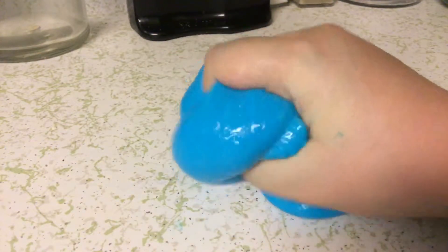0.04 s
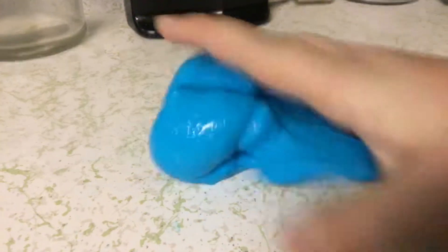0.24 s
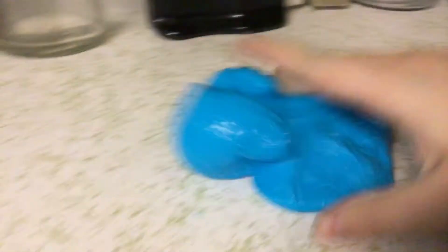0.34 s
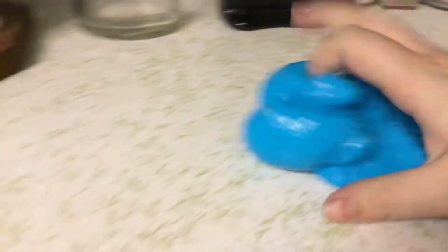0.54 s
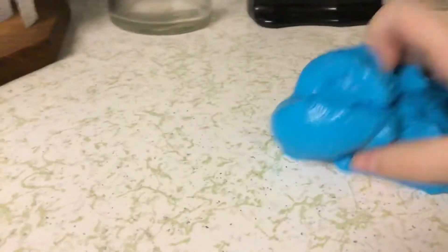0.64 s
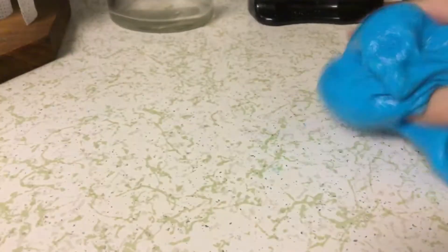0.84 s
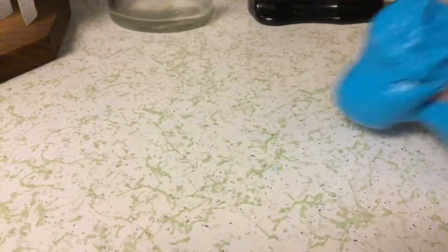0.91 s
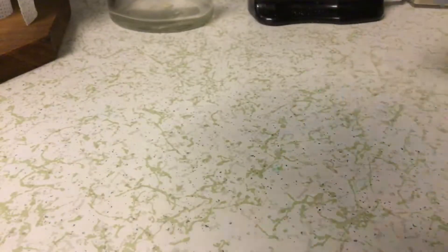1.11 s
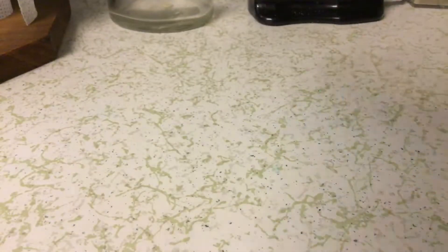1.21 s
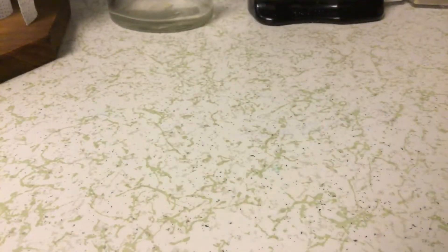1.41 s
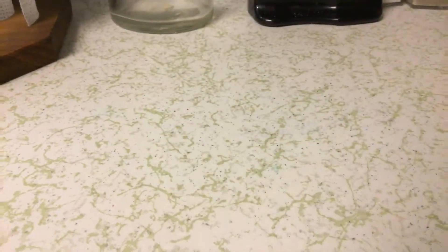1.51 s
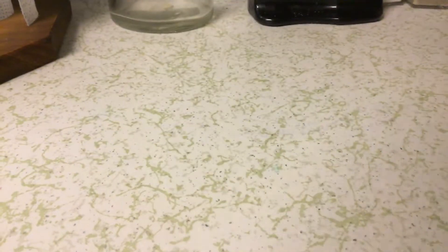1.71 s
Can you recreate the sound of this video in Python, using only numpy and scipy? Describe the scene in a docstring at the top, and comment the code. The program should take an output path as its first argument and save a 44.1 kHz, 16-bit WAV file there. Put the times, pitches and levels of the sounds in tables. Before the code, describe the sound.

Wet slime squeezed by hand snaps and pops sharply, then drags and peels off a counter

```python
"""A low hum and a faint crackle in a small room come first; then a hand squeezes slime on a kitchen counter.
Air pockets snap and pop, the soft mass thuds and air squelches out of its folds, close to the microphone.
The slime is dragged aside with a fluttering hiss and peels off the counter with a hollow rasp.
Snaps, pops, bubbles and thuds are fading sine waves, snaps with a noisy crack on top.
Squelches, crackles, drag and peel are showers of random clicks, shaped in tone and level."""
import sys
import numpy as np
from scipy import signal
from scipy.fft import rfft, irfft
from scipy.io import wavfile

SR = 44100
rng = np.random.default_rng(int(sys.argv[2]) if len(sys.argv) > 2 else 0)


def waveform_to_disk(signal):
    """Save audio, clipped to [-1, 1], as 16-bit WAV at the path in sys.argv[1]."""
    frames = np.transpose(np.atleast_2d(signal))
    scaled = np.clip(frames, -1, 1) * 32767
    samples = np.round(scaled).astype(np.int16)
    wavfile.write(sys.argv[1], SR, samples)


N = 77175  # length in samples: 1.75 s
T = np.arange(N) / SR  # time of each sample [s]
FREQS = np.maximum(np.arange(N // 2 + 1) * SR / N, 1)  # pitch of each spectrum bin [Hz], never 0


def undb(db):
    """Turn decibels into a gain."""
    return 10 ** (np.asarray(db) / 20)


def unit(x):
    """Scale a sound to an average (rms) level of 1."""
    return x / np.sqrt(np.mean(x ** 2))


def level_at(points):
    """Join (time, level) points with straight lines, one level in dB for each sample."""
    times, levels = np.array(points).T
    return np.interp(T, times, levels)


def colour(x, points):
    """Shape the tone of a sound by (frequency, level) points, at rms 1."""
    hz, db = np.array(points).T
    tone = undb(np.interp(np.log(FREQS), np.log(hz), db))
    return unit(irfft(rfft(x) * tone, N))


def fade(age, t60):
    """Die away evenly in dB, by 60 dB in t60 seconds."""
    return np.exp(-np.log(1000) * np.maximum(age, 0) / t60)


def swell(start, rise, t60):
    """Rise in a straight line, then die away."""
    return np.clip((T - start) / rise, 0, 1) * fade(T - start - rise, t60)


def sing(pitch):
    """A sine wave that follows a changing pitch [Hz]."""
    return np.sin(2 * np.pi * np.cumsum(pitch) / SR)


def grains(per_s):
    """Tiny ruptures: one-sample clicks of random size at random times."""
    return (rng.random(N) < per_s / SR) * rng.standard_normal(N)


def wander(per_s):
    """Random values joined by straight lines."""
    return np.interp(T * per_s, np.arange(1000), rng.standard_normal(1000))


def bursts(table, per_s):
    """Showers of equally strong ruptures, each coloured by the fold that it comes from."""
    out = np.zeros(N)
    for start, rise, t60, db, hz, octaves in table:
        # a bell around the centre with long skirts, leaning towards the bass
        distance = np.log2(FREQS / hz) / octaves
        bell = (1 + distance ** 2 / SQUELCH_SKIRT) ** (-SQUELCH_SKIRT / 2)
        fold = bell / np.sqrt(FREQS + hz)
        ruptures = np.sign(grains(per_s))
        out += undb(db) * swell(start, rise, t60) * unit(irfft(rfft(ruptures) * fold, N))
    return out


SQUELCH_SKIRT = 4.14  # higher makes the skirts of each bell fall faster

# tone of the room noise: (frequency [Hz], level per Hz [dB])
ROOM_TONE = [(15, -42), (25, -25), (87, -24), (114, 2), (153, -12.5), (190, -5.5), (223, -10), (354, -6.5),
             (427, -21), (489, -14), (531, -20), (677, -15.5), (754, -25.5), (7510, -47), (16000, -54)]
ROOM_TONE_DB = -57
# tones of the appliance hum: (frequency [Hz], rms level before the waver [dB])
HUM_TONES = [(59.2, -66.5), (118.4, -72.5), (188.4, -68.5), (360.7, -69.5)]
HUM_WAVER_DB, HUM_WAVER_PER_S = 3.5, 9.1
# change in the level of the background's bass: (time [s], level [dB])
RUMBLE = [(0, 6), (.8, -10), (.98, -3), (1.27, -8), (1.45, 2), (1.75, 1.5)]
RUMBLE_BELOW_HZ = 128


def background():
    """Room noise and a wavering appliance hum, whose bass dips for a while."""
    out = undb(ROOM_TONE_DB) * colour(rng.standard_normal(N), ROOM_TONE)
    for hz, db in HUM_TONES:
        level = undb(db + HUM_WAVER_DB * wander(HUM_WAVER_PER_S))
        out += np.sqrt(2) * level * np.sin(2 * np.pi * (hz * T + rng.random()))
    low_pass = signal.butter(2, RUMBLE_BELOW_HZ, fs=SR, output="sos")
    bass = signal.sosfiltfilt(low_pass, out)
    return out + bass * (undb(level_at(RUMBLE)) - 1)


# how loudly the slime drags over the counter, before the flutter: (time [s], level [dB])
DRAG = [(0, -69), (.15, -67), (.22, -60.5), (.3, -57), (.37, -54.5), (.42, -49), (.5, -54), (.62, -52.5),
        (.7, -56.5), (.78, -56.5), (.86, -66.5), (1.15, -75.5), (1.75, -80)]
# tone of the dragging hiss: (frequency [Hz], level per Hz [dB])
DRAG_COLOUR = [(200, -33), (420, -4), (620, 2.5), (900, -11.5), (1300, -6), (1700, -8), (2200, -4.5),
               (2700, -3), (3500, -2), (4500, -2), (5400, -10), (6900, -11.5), (8300, -13), (11300, -12.5),
               (15500, -15)]
DRAG_GRAINS_PER_S = 14000
DRAG_COARSE_DB, DRAG_COARSE_PER_S = -5.5, 620  # level against the fine contacts
DRAG_FLUTTER_DB, DRAG_FLUTTER_PER_S = 1.1, 120


def drag():
    """A fluttering hiss of countless small contacts letting go, with a few coarser ones."""
    fine = unit(grains(DRAG_GRAINS_PER_S))
    coarse = undb(DRAG_COARSE_DB) * unit(grains(DRAG_COARSE_PER_S))
    level = level_at(DRAG) + DRAG_FLUTTER_DB * wander(DRAG_FLUTTER_PER_S)
    return colour(fine + coarse, DRAG_COLOUR) * undb(level)


# small sticky ticks and crackles:
# (time [s], rise [s], t60 [s], level [dB], centre [Hz], width [octaves])
CRACKLES = [(0, 0.026, 1, -61, 556, .9), (.0615, 0.00068, 0.047, -51.5, 2530, 0.59),
            (.0615, 0.00082, 0.025, -59, 12900, 0.064), (.2035, 0.0023, 0.062, -51.5, 2300, 1),
            (.2885, 0.00026, 0.0027, -33.5, 3920, 1.15), (.342, .004, 0.041, -53, 13000, .2),
            (.3855, .0005, 0.011, -57, 2500, 1.1), (.6505, 0.00068, 0.0055, -43.5, 4000, 0.76),
            (.97, 0.045, 1, -68.5, 1900, 0.47), (1.035, 0.0032, .03, -62.5, 2760, 0.4),
            (1.03, .02, 0.072, -69.5, 11100, 0.56), (1.128, 0.0094, 0.041, -66, 11100, 1.2),
            (1.29, 0.014, 0.096, -66, 5080, 0.15), (.7325, 0.0014, 0.018, -46, 490, 0.55),
            (1.35, 0.0018, 0.022, -66, 5500, 0.44), (1.397, 0.0072, 0.28, -60.5, 760, 0.64),
            (1.40, 0.017, 0.4, -67.5, 4860, 1.1), (1.452, 0.0043, 0.18, -60, 4960, 0.9),
            (1.47, .016, 0.07, -59, 4000, 2.2), (1.486, 0.0014, 0.1, -56.5, 1060, 2),
            (1.495, 0.002, 0.14, -55.5, 690, 0.47), (1.539, .002, .06, -64.5, 5000, 0.92),
            (1.63, 0.01, 0.087, -73.5, 8250, 0.22)]
CRACKLE_GRAINS_PER_S = 2300


def crackles():
    """The sticky skin ticks and crackles in thin showers of ruptures."""
    return bursts(CRACKLES, CRACKLE_GRAINS_PER_S)


# soft mass meeting the counter: (time [s], first pitch [Hz], level [dB], rise [s], t60 [s])
THUDS = [(.066, 112, -45, 0.0092, 0.095), (0.246, 142, -27, 0.0023, 0.076), (0.282, 91, -40, 0.003, 0.1),
         (0.3, 114, -34, 0.0031, 0.089), (.382, 226, -37, 0.0025, 0.048), (0.393, 117.5, -29, 0.004, 0.14),
         (.652, 178, -41.5, .002, 0.04), (0.666, 95, -44, .006, .11), (0.7348, 162, -38, 0.0014, 0.034),
         (0.774, 99, -46, 0.0091, .1)]
SAG_SHARE, SAG_S = 0.7, 0.024  # share of the pitch that is lost, and how slowly


def thuds():
    """Low, soft bumps that sink in pitch as the mass spreads."""
    out = np.zeros(N)
    for start, hz, db, rise, t60 in THUDS:
        age = np.maximum(T - start, 0)
        sag = SAG_SHARE * (1 - np.exp(-age / SAG_S))
        pitch = hz * (1 - sag) * (T >= start)
        out += undb(db) * swell(start, rise, t60) * sing(pitch)
    return out


# the hollow beneath the slime: (frequency [Hz], width [Hz], level against the other rings [dB])
HOLLOW = [(900, 300, -0.5), (1255, 205, 4), (1640, 410, -4.5), (2515, 156, 5.5), (3410, 226, 0),
          (4010, 220, -1), (5080, 480, -6), (6260, 1030, -13)]
PEEL_S, PEEL_RISE_S, PEEL_T60_S = 0.776, 0.0041, 0.21
PEEL_DB, PEEL_GRAINS_PER_S = -38, 5000


def peel():
    """The slime tears off the counter: tiny ruptures ring the hollow that opens under it."""
    body = 0
    for k, (hz, width, db) in enumerate(HOLLOW):
        ring = undb(db) / (1 + 1j * (FREQS ** 2 - hz ** 2) / (FREQS * width))
        body = body + ring * (-1) ** k  # every other ring is flipped
    rasp = unit(irfft(rfft(grains(PEEL_GRAINS_PER_S)) * body, N))
    return undb(PEEL_DB) * swell(PEEL_S, PEEL_RISE_S, PEEL_T60_S) * rasp


# air forced out of folds:
# (time [s], rise [s], t60 [s], level [dB], centre [Hz], width [octaves])
SQUELCHES = [(.262, 0.0015, .14, -44, 1830, 0.72), (.33, 0.0027, 0.072, -44, 1140, 0.76),
             (.338, 0.01183, 0.077, -40, 827, 0.8), (.335, 0.023, 0.054, -46, 3700, 0.3),
             (.38, 0.0036, 0.044, -48, 750, 0.54), (0.384, .03, .25, -54, 4600, 0.22),
             (.452, .01, .05, -54, 1280, 0.15), (0.74, 0.017, 0.09, -52.5, 5530, 0.24),
             (.876, 0.0014, .25, -49, 850, 0.57), (.895, 0.03, 0.18, -38, 748, 0.59),
             (0.896, 0.015, .2, -45.5, 199.6, 0.82)]
SQUELCH_GRAINS_PER_S = 4500
# level against the squelch, cycles of ring until 60 dB down, share of the fold's width
BUBBLE_DB, BUBBLE_CYCLES, BUBBLE_SPREAD = -4.5, 31, 0.654


def squelches():
    """Air pushes out of the folds in dense showers of ruptures."""
    return bursts(SQUELCHES, SQUELCH_GRAINS_PER_S)


def microbubbles():
    """Each squelch bursts eight tiny bubbles that ring near the pitch of its fold."""
    out = np.zeros(N)
    age = np.arange(SR // 10) / SR
    for squelch_start, rise, t60, db, centre, octaves in SQUELCHES:
        for when, pitch, size in rng.random(size=(8, 3)):
            delay = when * (rise + t60 / 4)
            hz = centre * 2 ** (BUBBLE_SPREAD * octaves * (2 * pitch - 1))
            # a bubble follows the level of its squelch at that moment, times a random size
            squelch_level = min(delay / rise, 1) * fade(delay - rise, t60)
            gain = 2 * size * undb(db + BUBBLE_DB) * squelch_level
            ring = np.sin(2 * np.pi * hz * age) * fade(age, BUBBLE_CYCLES / hz)
            i = int((squelch_start + delay) * SR)
            out[i:i + len(age)] += gain * ring
    return out


# air pockets ringing as they open:
# (time [s], first pitch [Hz], level [dB], t60 [s], glide [octaves per s])
POCKETS = [(.0606, 12760, -31, .003, -3), (.0612, 2230, -40.5, 0.0057, -5), (.2415, 701, -26.5, 0.046, -2),
           (.2482, 369, -14.5, 0.033, 3), (.2492, 602.4, -21.5, 0.048, 0), (.2515, 810, -27.5, 0.034, -5.5),
           (.2517, 2136, -20.5, .014, 13), (.266, 390, -44, 0.1, 10), (.300, 556, -40, 0.019, -5),
           (.332, 604, -44.5, 0.066, -7), (.347, 504, -40, 0.14, 4), (.778, 3550, -38, 0.05, 2),
           (0.7784, 1167, -36, 0.022, 4), (.919, 970, -36.5, 0.029, 0), (1.458, 3240, -56.5, .03, -6),
           (1.4855, 1450, -51.5, .03, 3)]
POCKET_RISE_CYCLES, POCKET_OPEN_S = 0.33, 0.00025  # both add to the rise


def pockets():
    """Each air pocket pops open and rings with a gliding pitch; its wave starts downwards."""
    out = np.zeros(N)
    for start, hz, db, t60, glide in POCKETS:
        pitch = hz * 2 ** (glide * np.clip(T - start, 0, t60)) * (T >= start)
        rise = POCKET_OPEN_S + POCKET_RISE_CYCLES / hz
        out -= undb(db) * swell(start, rise, t60) * sing(pitch)
    return out


# skin snapping open: (time [s], level before the crack and ring levels [dB], t60 of the crack [s])
SNAPS = [(.2404, -17, 0.0071), (.2415, -28, .016), (.2462, -23, 0.028), (.2480, -34.5, 0.018),
         (.2515, -32.5, 0.025), (.2562, -28, 0.011)]
# what the snapping skin rings with: (frequency [Hz], level against the snap's ring [dB], t60 [s])
SKIN = [(1120, -19, 0.033), (1330, -13.5, 0.038), (1456, -11, 0.076), (2260, -8, 0.034), (2697, -12, 0.05),
        (2810, -3, 0.014), (3070, -6.5, 0.02), (3480, -14, 0.019), (7140, -15.5, 0.028), (7610, -5, 0.024),
        (8300, -6.5, 0.0059), (10990, -14, 0.014)]
# tone of the crack: (frequency [Hz], level [dB])
CRACK = [(300, -17), (800, 0.5), (2500, 1), (3600, -2), (4700, -16.5), (7600, -2.5), (9500, -6.5),
         (13000, -15.5), (16000, -16)]
SNAP_CRACK_DB, SNAP_RING_DB = -5, -5
SNAP_RISE_S, SKIN_DETUNE = 0.000067, 0.0068  # detune: typical random share of the pitch


def snaps():
    """The skin tears with a short noisy crack and rings at many pitches."""
    crack_level = np.zeros(N)
    ring = np.zeros(N)
    for start, db, crack_t60 in SNAPS:
        crack_level += undb(db) * swell(start, SNAP_RISE_S, crack_t60)
        age = np.maximum(T - start, 0)
        for hz, mode_db, t60 in SKIN:
            pitch = hz * (1 + SKIN_DETUNE * rng.standard_normal())
            ring += undb(db + mode_db) * np.sin(2 * np.pi * pitch * age) * fade(age, t60)
    crack = colour(rng.standard_normal(N), CRACK) * crack_level
    return undb(SNAP_CRACK_DB) * crack + undb(SNAP_RING_DB) * ring


ROOM_DELAY_S, ROOM_RISE_S, ROOM_T60_S = 0.0076, 0.0095, 0.24
ROOM_DB, ROOM_TOP_HZ = -22.5, 4280


def room(x):
    """A short, dull tail from the walls, made of fading noise."""
    noise = rng.standard_normal(N) * swell(ROOM_DELAY_S, ROOM_RISE_S, ROOM_T60_S)
    dull = rfft(noise) / np.hypot(1, FREQS / ROOM_TOP_HZ)
    tail = unit(irfft(dull, N)) / np.sqrt(N)  # total energy 1
    return undb(ROOM_DB) * signal.fftconvolve(x, tail)[:N]


def scene():
    """The slime close by, in its room."""
    close = crackles() + peel() + squelches() + microbubbles() + pockets() + snaps()
    return (background() + drag() + thuds() + close + room(close))[None]


LOW_CUT_HZ, TOP_HZ = 33, 15900


def record(dry):
    """The recorder cuts the deepest bass and the top."""
    low_cut = signal.butter(2, LOW_CUT_HZ, "high", fs=SR, output="sos")
    top_cut = signal.ellip(8, 0.2, 70, TOP_HZ, fs=SR, output="sos")  # 0.2 dB ripple, 70 dB cut
    return signal.sosfilt(top_cut, signal.sosfilt(low_cut, dry))


dry = scene()
out = record(dry)
waveform_to_disk(out)
```